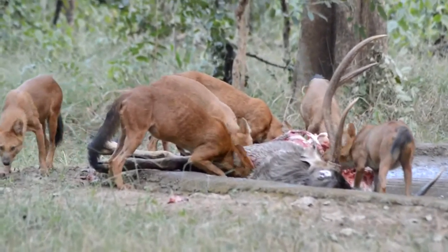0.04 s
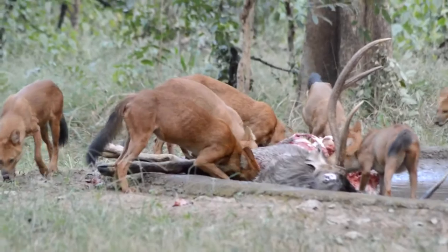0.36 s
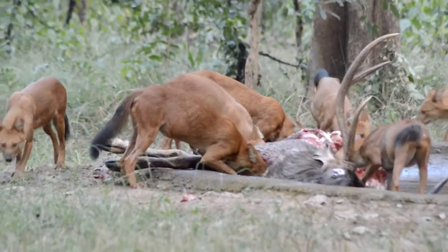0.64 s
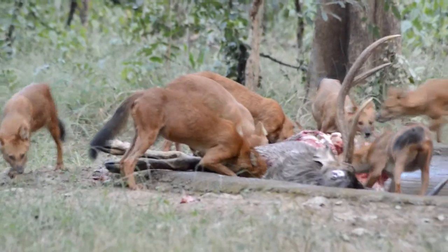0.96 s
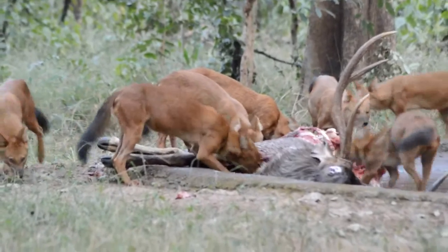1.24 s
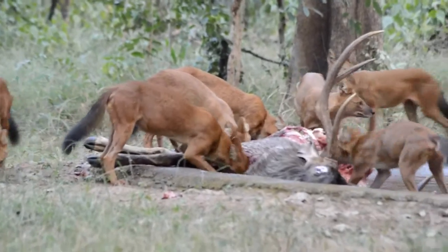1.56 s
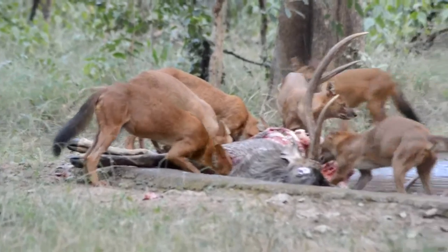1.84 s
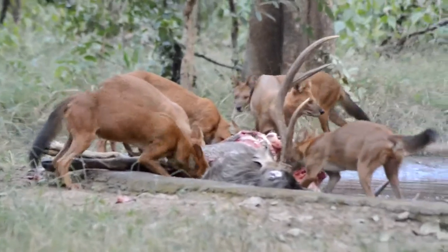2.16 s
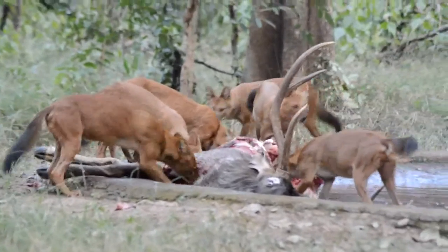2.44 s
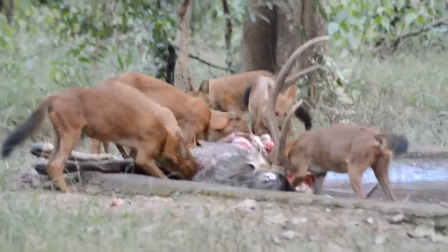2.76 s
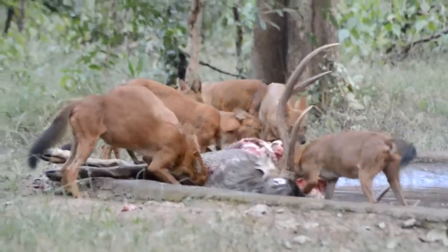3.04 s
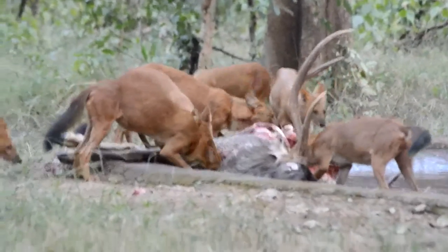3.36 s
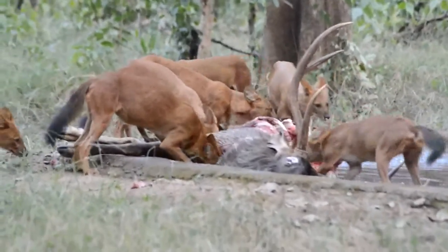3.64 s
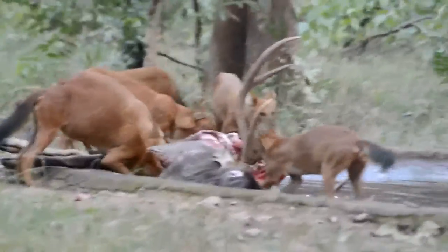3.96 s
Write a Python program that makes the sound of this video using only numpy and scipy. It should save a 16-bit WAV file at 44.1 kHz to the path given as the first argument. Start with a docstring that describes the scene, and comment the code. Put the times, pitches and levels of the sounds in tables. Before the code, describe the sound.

Thin whines and quick rising chirps from wild dogs echo among trees, with a few close knocks.

```python
"""Thin whines and quick rising chirps ring among the trees: wild dogs feeding at a forest edge.
Each call is a wavering harmonic tone shaped by throat and mouth, echoing off the trunks.
Paws rustle dry leaves, twigs tick and soft low thuds sound over a steady outdoor hush.
A few dry knocks sound right beside the microphone, probably from handling."""
import sys
import numpy as np
from scipy import signal
from scipy.fft import rfft, irfft
from scipy.io import wavfile
from scipy.ndimage import uniform_filter1d

SR = 44100
rng = np.random.default_rng(int(sys.argv[2]) if len(sys.argv) > 2 else 0)


def pcm_store(signal):
    """Save signal as 16-bit PCM."""
    levels = np.round(np.clip(np.atleast_2d(signal), -1, 1) * 32767)
    wavfile.write(sys.argv[1], SR, levels.astype(np.int16).T)


N = 176400

# The dogs' whines (start [s], length [s], first pitch [Hz], middle pitch [Hz], last pitch [Hz],
# level before the throat [dB], brightness [dB/octave], roughness [factor], echo send [dB])
WHINES = [(-.1, 0.12, 1381, 1474, 1529, -52.5, 6, 1.44, 2.5),
          (.195, 0.1, 1485, 1559, 1452, -55, -1, 1.02, -2),
          (0.249, 0.048, 1540, 1572, 1530, -58, -1, 0.65, -2),
          (0.473, 0.125, 1548, 1688, 1730, -52.5, 2.5, 0.76, 0),
          (0.912, 0.098, 1880, 1965, 1975, -53.5, 7, 0.92, -7),
          (1.078, 0.14, 1022, 1519, 1618, -55, 0, 1.96, 3.5),
          (1.17, 0.065, 1285, 1380, 1353, -53, 4.5, 1.7, -1),
          (1.271, .125, 1554, 1860, 1944, -42.5, 0, 1.27, -2.5),
          (1.466, 0.085, 1908, 1990, 2010, -50, 3, 0.91, -0.5),
          (1.842, 0.12616, 1554, 1773, 1927, -45.5, 2.5, 1.1, 0),
          (1.855, 0.11995, 1489, 1553, 1690, -50.5, 1.5, 1.4, -2),
          (2.327, 0.092, 1440, 1577, 1460, -51, 0.5, 0.73, -1),
          (2.455, 0.062, 1649, 1729, 1732, -48, 5.5, 1.115, -1),
          (2.53, 0.15, 1564, 1795, 1903, -44, 2, 1, -2),
          (2.757, 0.093, 1394, 1550, 1563, -49, -1, 1.25, -3),
          (2.958, 0.073, 3343, 3420, 3355, -53, 19.5, 1.7, -1.5),
          (2.999, 0.059, 3317, 3410, 3432, -44.5, 6, 2.4, -4),
          (3.06, 0.11, 1590, 1756, 1738, -48, 12.5, 0.71, -1.5),
          (3.319, 0.13, 1560, 1832, 2015, -41.5, 1.5, 1.17, -1),
          (3.683, 0.039, 1950, 2040, 1820, -45, 1.5, 1.15, 2.5),
          (3.717, 0.044, 1851, 1697, 1750, -43.5, 2, 1.46, -6),
          (3.92, 0.086, 1476, 1622, 1556, -49, 0, 1.2, -3)]
# Their chirps (sweep start [s], sweep length [s], first pitch [Hz], last pitch [Hz],
# level before the throat [dB], lead-in offset [dB], overtones [dB], echo send [dB])
CHIRPS = [(-.014, 0.064, 2272, 3677, -38.5, -2, 4, -1), (0.598, 0.061, 2162, 3650, -43, -12.5, 5.5, 2),
          (1.143, 0.026, 2117, 3026, -37, -14, -7, -4), (2.028, 0.034, 2204, 3516, -39.5, -17, 1, -3),
          (3.072, 0.055, 2270, 3740, -39, -9, 8, -1), (3.766, 0.092, 2354, 4120, -36, -25, -1, -5.5)]
# Resonances of throat and mouth (frequency [Hz], gain [dB])
THROAT = [(1400, -13.5), (1900, -15), (2400, -13), (3000, -5.5), (3600, -1.5), (4200, -8.5), (4750, -4.5),
          (5300, -13), (5900, -12.5), (6350, -21), (6900, -26), (7800, -37), (9000, -26.5), (10200, -40),
          (14000, -66)]
# Hollow knocks beside the microphone (time [s], level [dB], brightness [dB/octave])
KNOCKS = [(2.783, -33, -2.5), (2.8245, -10, 0), (2.839, -30, -3.5)]
# Modes that a knock rings (frequency [Hz], level [dB], time to fall 60 dB [s])
KNOCK_MODES = [(907, -4.5, 0.025), (1160, -13.5, 0.019), (1785, -2, 0.018), (2030, -11, 0.02598),
               (2471.8, -17.5, 0.0214), (2860, 4.5, 0.017), (3858.1, -2, 0.007722), (6600, -20, 0.0085)]
# Sharper clacks, just as close (time [s], level [dB], brightness [dB/octave])
CLACKS = [(3.8457, -20.5, -3), (3.9552, -26.5, 12.5), (3.9675, -9, 5), (3.9825, -37, 11.5)]
# Modes that a clack rings (frequency [Hz], level [dB], time to fall 60 dB [s])
CLACK_MODES = [(1123, -3, 0.016), (2136, -6.5, 0.02), (2650, -11, 0.015), (2960, -8, 0.016),
               (3850, -15, 0.01098), (6520, -18.5, 0.01), (7900, -16, 0.0046)]
# Spectrum of the crack at contact (frequency [Hz], relative level [dB])
CRACK_SPECTRUM = [(200, -32), (500, -27), (1000, 9.5), (3500, 1.5), (6000, -3.5), (11000, -4), (15000, -34)]
# Paws in dry leaves (start [s], length [s], level [dB], brightness [dB/octave])
RUSTLES = [(0.745, 0.17073, -55.5, 4), (1.1, 0.28, -62.5, -3.5), (1.22, 0.42, -57.5, 3.5),
           (1.434, 0.032, -52, 2), (2.296, 0.073, -46.5, 0.5), (2.361, 0.15, -53, 2),
           (2.451, 0.059, -47, 0), (2.49, 0.12, -49, 2), (3.077, 0.05, -49, 0), (3.755, 0.394, -53, 3),
           (3.944, 0.03571, -39.5, 4.5)]
# Spectrum of the leaves (frequency [Hz], relative level [dB])
LEAF_SPECTRUM = [(200, -1), (500, -3.5), (1000, 0.5), (2000, 4), (4000, 0), (7000, -6), (10000, -10.5),
                 (15000, -38)]
# Twig ticks (time [s], band centre [Hz], level [dB])
TICKS = [(0.928, 7790, -44.5), (.947, 6160, -46), (1, 7030, -50), (1.62, 6401, -46.5), (2.526, 8994, -50),
         (3.901, 8634, -54), (3.938, 9000, -43.5), (3.982, 9770, -43)]
# Soft low thuds, plus the low body and brief ring of the last clack beside the microphone
# (start [s], length [s], band centre [Hz], width [octaves], level [dB])
THUDS = [(1.095, 0.14, 320, 0.47, -57.5), (1.143, 0.24, 112.5, 0.32, -57), (1.429, 0.03276, 350, 0.28, -56),
         (1.778, 0.14, 675, 0.2861, -61.5), (2.404, 0.027, 502.4, 1, -54.5),
         (2.644, 0.0551, 129.5, 0.2, -58), (3.75, 0.03, 115, 0.29, -49), (3.952, 0.011, 170, 0.72, -35),
         (3.945, 0.041, 89.5, 0.27, -40.5), (3.969, .012, 320, 1, -39.5),
         (3.965, 0.039, 634.3, 0.10005, -38)]
# Spectrum of the outdoor hush (frequency [Hz], relative level [dB])
HUSH_SPECTRUM = [(20, -21), (35, -7), (60, 6.5), (100, -0.5), (180, -2.5), (450, -4.5), (1000, -6),
                 (2000, -7.5), (3500, -4), (5500, -10), (8000, -14.5), (12000, -18.5), (16000, -22)]

TOP_HZ = 15800  # upper limit of the voices and the recorder


def dogs():
    """The pack from the microphone's position: each call arrives direct and by way of the trees."""
    preroll_s = 1  # calling is already under way at the start
    direct, into_trees = np.zeros((2, N + preroll_s * SR))
    t = np.arange(SR // 4) / SR
    for start, call, echo_db in [*whines(t), *chirps(t)]:
        add(direct, call, start + preroll_s)
        add(into_trees, undb(echo_db) * call, start + preroll_s)
    return (direct + forest_echo(into_trees))[preroll_s * SR:]


def whines(t):
    """Thin calls on a curved pitch, strongest in the middle; yields (start, call, echo send)."""
    swell_db = 4
    for start, length, first, middle, last, db, tilt, rough, echo_db in WHINES:
        progress = np.minimum(t / length, 1)
        hz = np.polyval(np.polyfit([0, .5, 1], [first, middle, last], 2), progress)
        effort = undb(db - swell_db * (2 * progress - 1) ** 2)
        effort *= gate(t, length, attack_s=.009, release_s=.0083)
        yield start, effort * voice(pitch_catches(hz), tilt, overtones_db=0, rough=rough), echo_db


def chirps(t):
    """A soft lead-in, then a fast climb that thins to a whistle; yields (start, call, echo send)."""
    lead_s, lead_hz_per_s, fade_db_per_khz = .042, 7000, 22
    for start, length, first, last, db, lead_db, overtones_db, echo_db in CHIRPS:
        knees = [0, lead_s, lead_s + length]
        hz = np.interp(t, knees, [first - lead_hz_per_s * lead_s, first, last])
        effort = undb(db + np.interp(t, knees, [lead_db, 0, 0]))
        effort *= gate(t, lead_s + length, attack_s=.00481, release_s=.016)
        fading_db = overtones_db - fade_db_per_khz * (hz - hz[0]) / 1000
        yield start - lead_s, effort * voice(hz, tilt=-4.5, overtones_db=fading_db, rough=1), echo_db


def voice(hz, tilt, overtones_db, rough):
    """Six wavering, rasping harmonics through the throat, tilted about its main resonance."""
    size = len(hz)
    waver = .0048 * walk(size, rate_hz=61)
    jitter = .0085 * walk(size, rate_hz=345)
    rasp = .013 * walk(size, rate_hz=1220)
    hz = hz * (1 + rough * (waver + jitter + rasp))
    phase = 2 * np.pi * np.cumsum(hz) / SR
    tone = np.zeros(size)
    for k in range(1, 7):
        harmonic_hz = k * hz
        db = tilt * np.log2(np.minimum(harmonic_hz, 7000) / 3400) + (k > 1) * overtones_db
        tone += response(THROAT, harmonic_hz) * undb(db) * (harmonic_hz < TOP_HZ) * np.sin(k * phase)
    breathiness = 1 + rough * .22 * walk(size, rate_hz=1200)
    shimmer_db = rough * 2 * walk(size, rate_hz=112)
    return np.sqrt(2) * tone * breathiness * undb(shimmer_db)


def pitch_catches(hz):
    """The pitch of a whine catches for uneven moments and then slips on."""
    hold_s, slip_s, stepped_share = .026, .009, .65
    edges = np.cumsum(hold_s * rng.uniform(.5, 1.5, 32))
    centres = (edges + np.append(0, edges[:-1])) / 2
    t = np.arange(len(hz)) / SR
    held = np.interp(centres, t, hz)[np.searchsorted(edges, t)]
    stepped = uniform_filter1d(held, int(slip_s * SR))
    return hz + stepped_share * (stepped - hz)


def forest_echo(calls):
    """Separate echoes from near trunks and a long diffuse ring that dulls as it fades."""
    split_hz, build_s, echoes_per_s, trunk_decay_s = 5000, .018, 400, .032
    t = np.arange(SR + SR // 2) / SR
    low = signal.sosfilt(signal.butter(2, split_hz, fs=SR, output="sos"), noise(len(t)))
    high = signal.sosfilt(signal.butter(2, split_hz, "high", fs=SR, output="sos"), noise(len(t)))
    tail = low * decay(t, t60_s=1.4) + high * decay(t, t60_s=1)
    tail *= 1 - np.exp(-t / build_s)
    trunks = impulses(len(t), echoes_per_s) * np.exp(-t / trunk_decay_s)
    echo = (undb(-.5) * unit(tail) + undb(-6) * unit(trunks)) / np.sqrt(len(t))
    return signal.fftconvolve(calls, echo)[:len(calls)]


def close_knocks(blows, modes, rise_s, crack_db):
    """Right beside the microphone, each blow gives a brief crack and rings a small, damped body."""
    crack_decay_s = .0011
    out = np.zeros(N)
    t = np.arange(SR // 8) / SR
    for start, db, tilt in blows:
        ring = np.zeros(len(t))
        for hz, mode_db, t60_s in modes:
            envelope = undb(mode_db + tilt * np.log2(hz / 2000)) * decay(t, t60_s)
            ring += envelope * np.sin(2 * np.pi * hz * t + rng.uniform(0, 2 * np.pi))
        crack = colour(noise(len(t)), CRACK_SPECTRUM, tilt)
        crack *= undb(crack_db + tilt) * np.exp(-t / crack_decay_s)
        add(out, undb(db) * (ring * np.minimum(t / rise_s, 1) + crack), start)
    return out


def leaf_rustles(t):
    """Dry leaves crackle under paws: dense, tiny clicks of uneven strength."""
    out = np.zeros(N)
    for start, length, db, tilt in RUSTLES:
        grains = impulses(N, per_s=3000)
        scatter_db = -.5 * np.minimum(rng.exponential(size=N), 4)
        envelope = undb(db) * gate(t - start, length, attack_s=.008634, release_s=.54 * length)
        out += envelope * colour(grains * undb(scatter_db), LEAF_SPECTRUM, tilt)
    return out


def twig_ticks(t):
    """Twigs tick on the forest floor: narrow bursts of high noise that die at once."""
    decay_s = .0026
    out = np.zeros(N)
    for start, hz, db in TICKS:
        age = np.maximum(t - start, 0) / decay_s
        out += undb(db) * 2 * np.sqrt(age) * np.exp(-age) * band(hz, octaves=.16)
    return out


def low_thuds(t):
    """Short swells of low noise: soft thuds, and the body and brief ring of the last close clack."""
    out = np.zeros(N)
    for start, length, hz, octaves, db in THUDS:
        envelope = undb(db) * gate(t - start, length, attack_s=.31 * length, release_s=.75 * length)
        out += envelope * band(hz, octaves)
    return out


def outdoor_hush():
    """The background of the forest edge: broad noise whose level drifts slightly."""
    level_db = -53.5 + walk(N, rate_hz=1.8)
    return undb(level_db) * colour(noise(N), HUSH_SPECTRUM)


def undb(db):
    """Decibels to gain."""
    return 10 ** (np.asarray(db) / 20)


def unit(x):
    """Scale to rms 1."""
    return x / np.sqrt(np.mean(x ** 2) + 1e-20)


def noise(size):
    """White noise."""
    return rng.standard_normal(size)


def impulses(size, per_s):
    """Clicks at random times and strengths."""
    return noise(size) * (rng.random(size) < per_s / SR)


def response(points, hz):
    """Gain of a (frequency [Hz], level [dB]) curve at given frequencies."""
    point_hz, point_db = np.array(points).T
    return undb(np.interp(np.log(hz + 1e-9), np.log(point_hz), point_db))


def colour(x, points, tilt=0):
    """Shape a sound by a spectrum and a tilt in dB per octave; rms 1."""
    hz = np.linspace(0, SR / 2, len(x) // 2 + 1)
    tilted = [(f, db + tilt * np.log2(f)) for f, db in points]
    return unit(irfft(rfft(x) * response(tilted, hz), len(x)))


def band(centre_hz, octaves):
    """Noise in a bell-shaped band; rms 1."""
    hz = np.linspace(1, SR / 2, N // 2 + 1)
    bell = np.exp(-.5 * (np.log2(hz / centre_hz) / octaves) ** 2)
    return unit(irfft(rfft(noise(N)) * bell, N))


def walk(size, rate_hz):
    """Smooth random drift with a spread near 1."""
    k = max(int(SR / rate_hz), 2)
    return uniform_filter1d(uniform_filter1d(noise(size + 2 * k), k), k)[k:-k] * np.sqrt(k)


def gate(t, length, attack_s, release_s):
    """Rounded attack, hold and release."""
    rise = np.sin(np.pi / 2 * np.clip(t / attack_s, 0, 1))
    fall = np.sin(np.pi / 2 * np.clip((length - t) / release_s, 0, 1))
    return rise * fall


def decay(t, t60_s):
    """A fall of 60 dB every t60_s."""
    return np.exp(-np.log(1000) * t / t60_s)


def add(out, x, start):
    """Mix a sound in at a time in seconds."""
    i = int(start * SR)
    out[i:i + len(x)] += x[:max(len(out) - i, 0)]


def scene():
    """The forest edge from one microphone position, the same in both channels."""
    t = np.arange(N) / SR
    hush = outdoor_hush()
    knocks = close_knocks(KNOCKS, KNOCK_MODES, rise_s=.0022, crack_db=-14)
    clacks = close_knocks(CLACKS, CLACK_MODES, rise_s=.00073, crack_db=-17.5)
    mix = dogs() + knocks + clacks + leaf_rustles(t) + twig_ticks(t) + low_thuds(t) + hush
    return np.tile(mix, (2, 1))


def record(dry):
    """The recorder cuts the top treble steeply."""
    return signal.sosfilt(signal.ellip(10, .2, 70, TOP_HZ, fs=SR, output="sos"), dry)


dry = scene()
out = record(dry)
pcm_store(out)
```